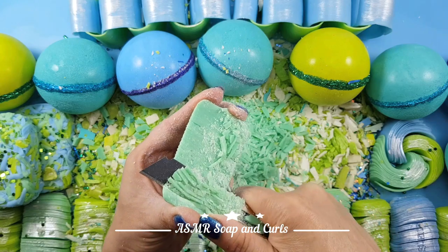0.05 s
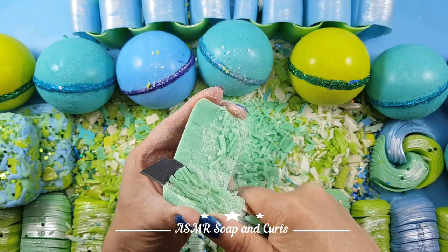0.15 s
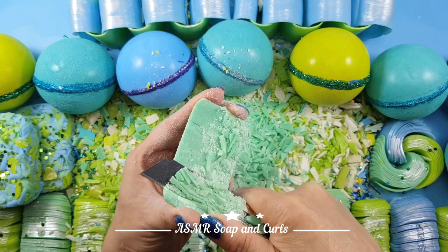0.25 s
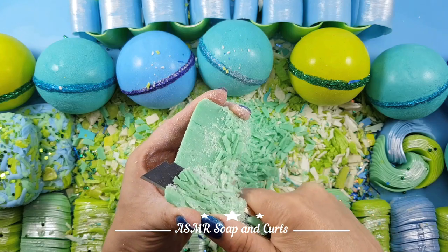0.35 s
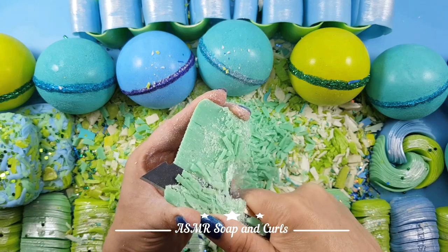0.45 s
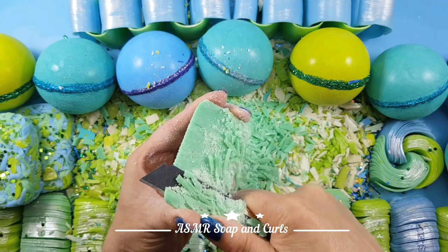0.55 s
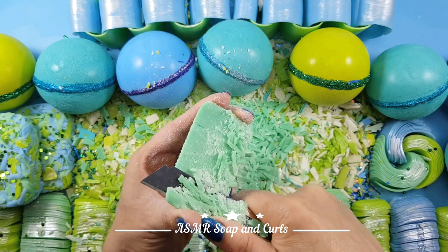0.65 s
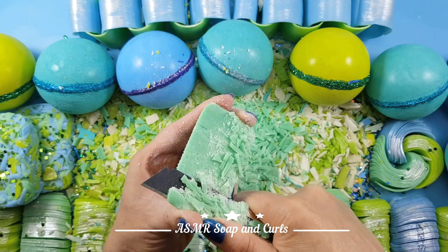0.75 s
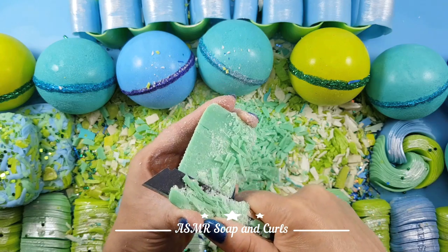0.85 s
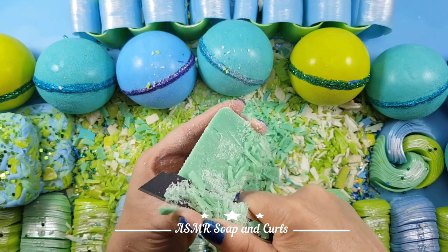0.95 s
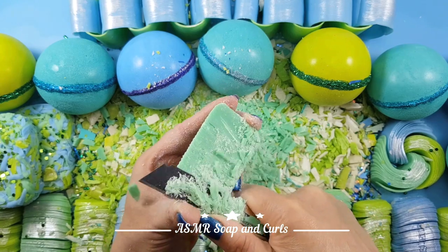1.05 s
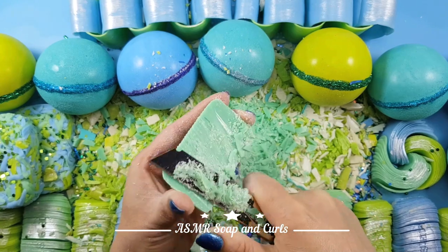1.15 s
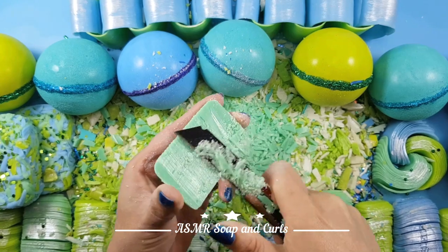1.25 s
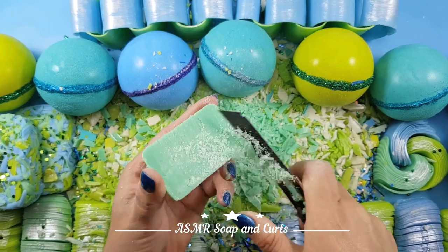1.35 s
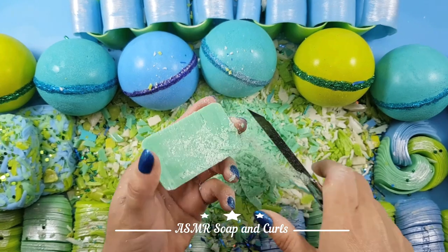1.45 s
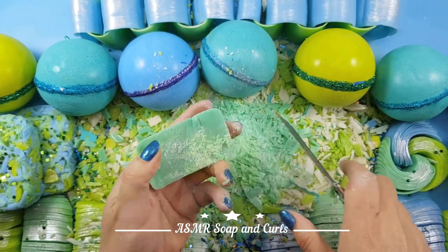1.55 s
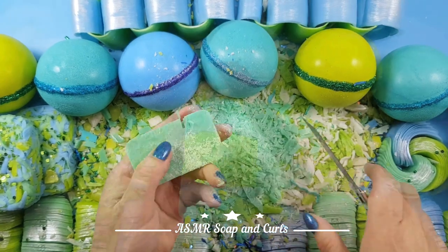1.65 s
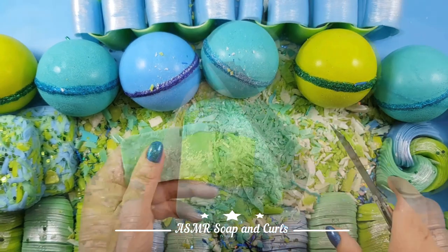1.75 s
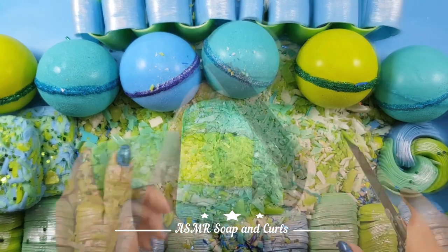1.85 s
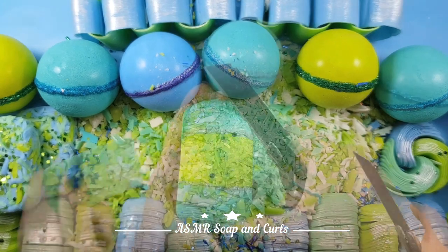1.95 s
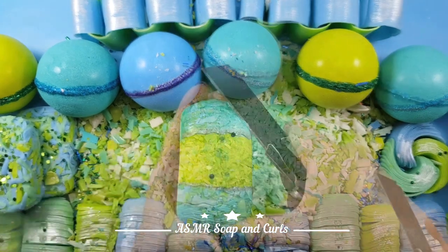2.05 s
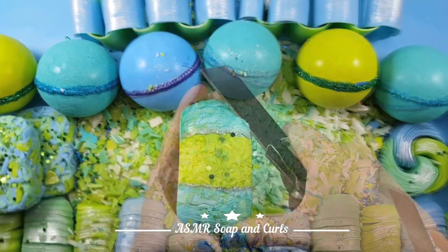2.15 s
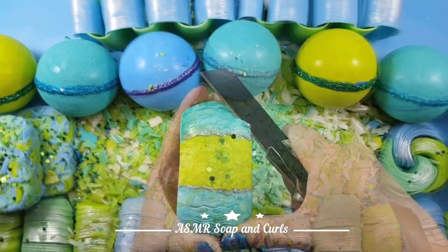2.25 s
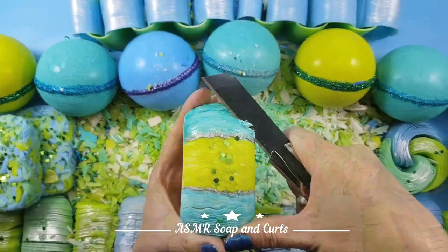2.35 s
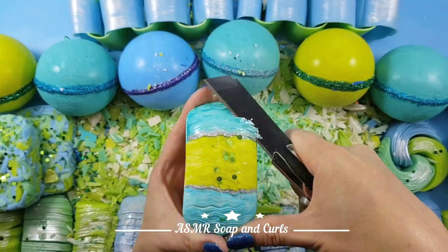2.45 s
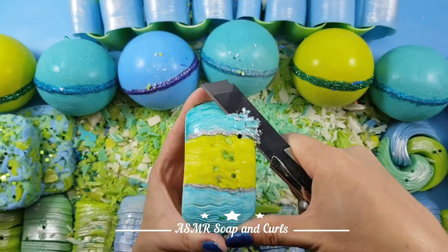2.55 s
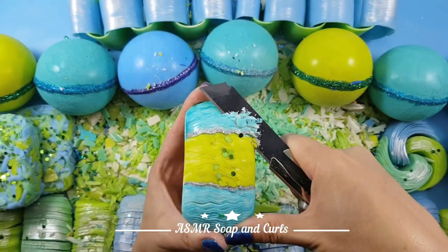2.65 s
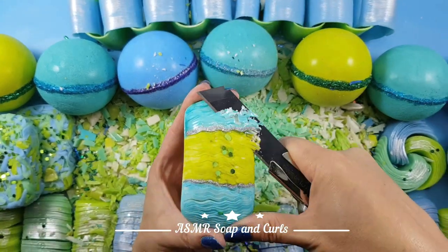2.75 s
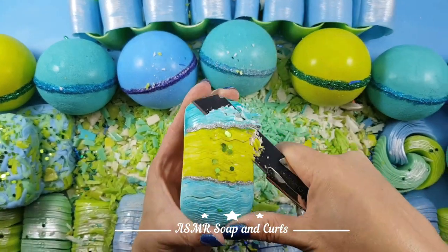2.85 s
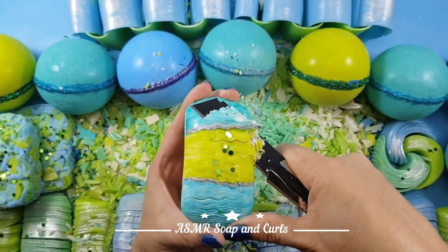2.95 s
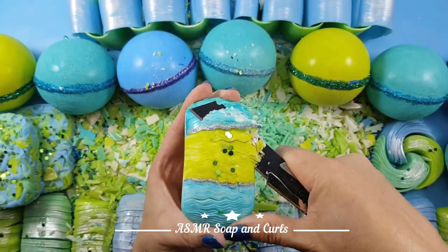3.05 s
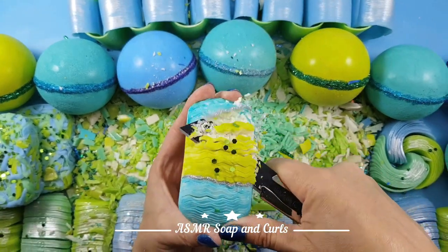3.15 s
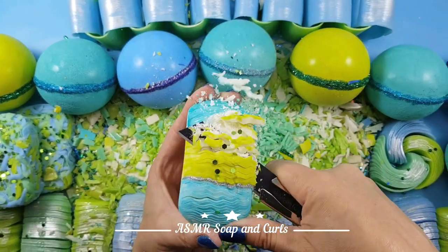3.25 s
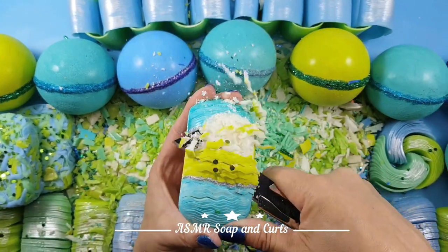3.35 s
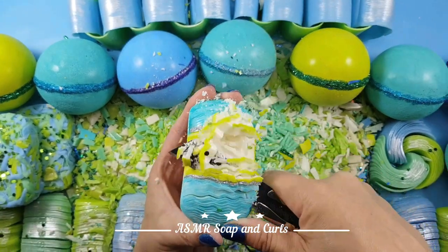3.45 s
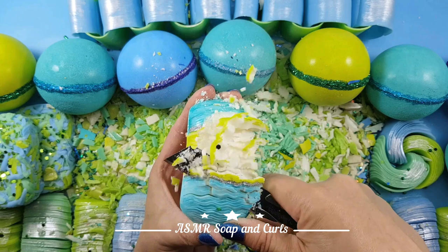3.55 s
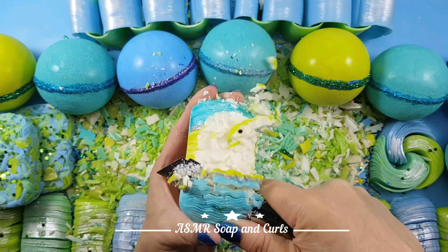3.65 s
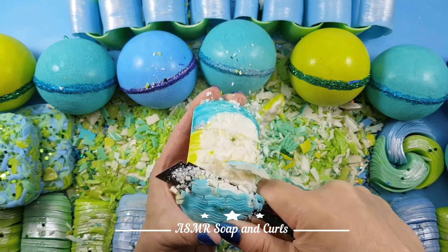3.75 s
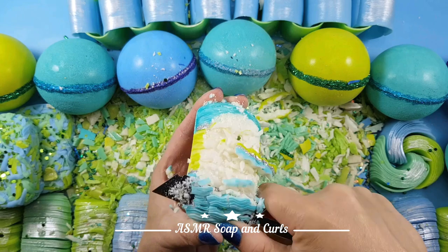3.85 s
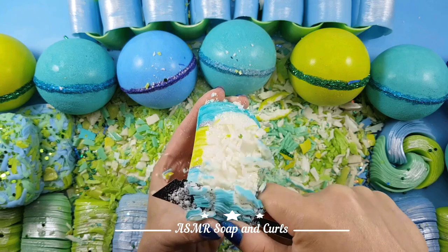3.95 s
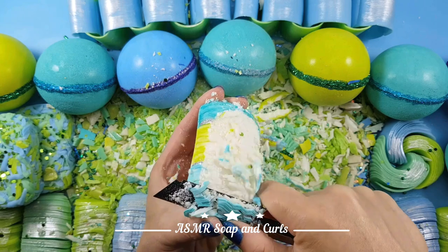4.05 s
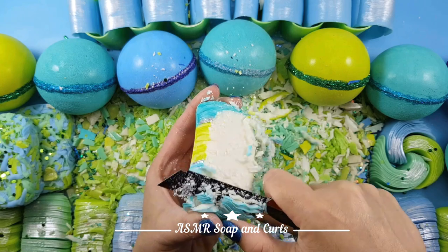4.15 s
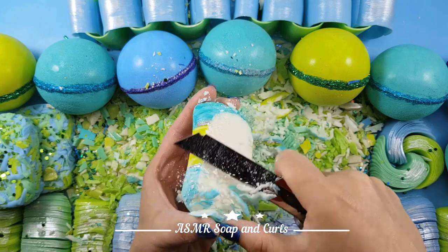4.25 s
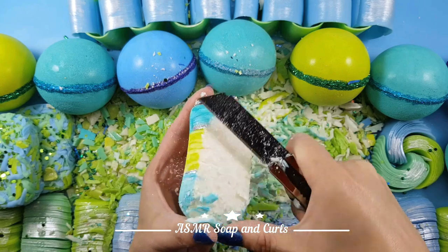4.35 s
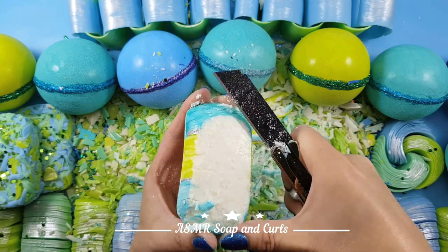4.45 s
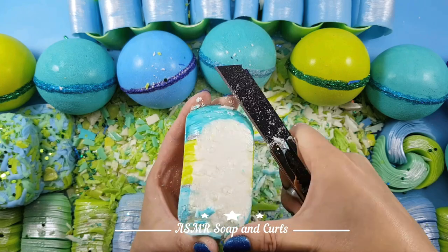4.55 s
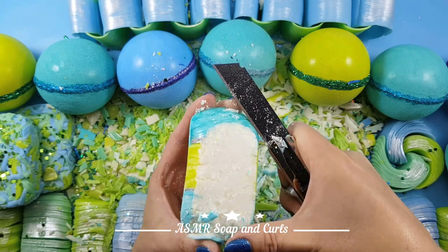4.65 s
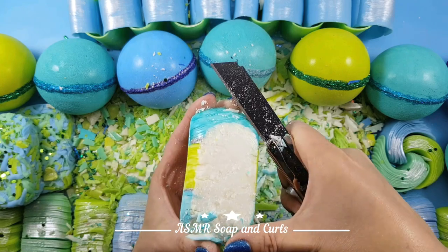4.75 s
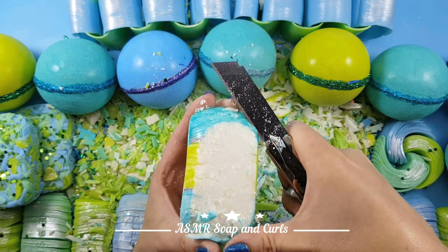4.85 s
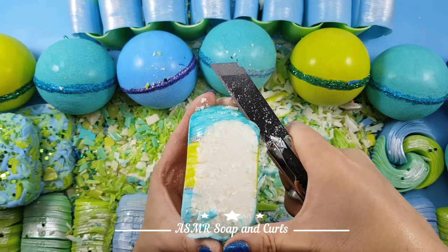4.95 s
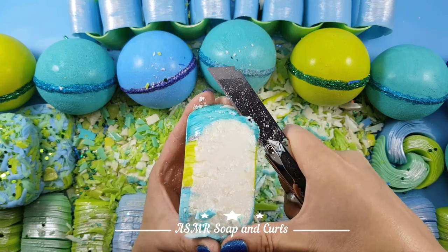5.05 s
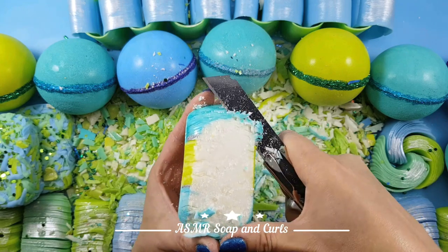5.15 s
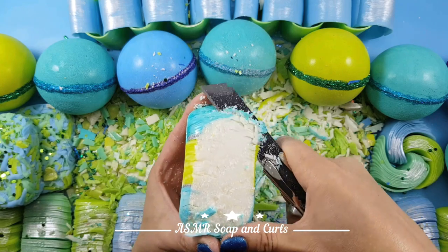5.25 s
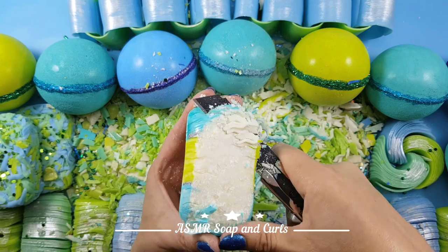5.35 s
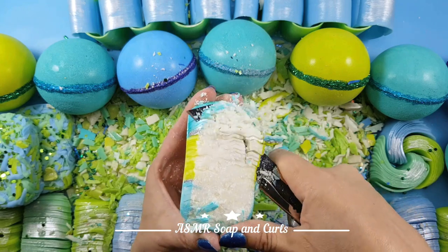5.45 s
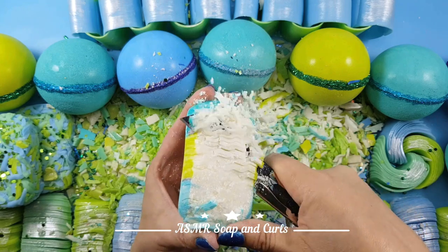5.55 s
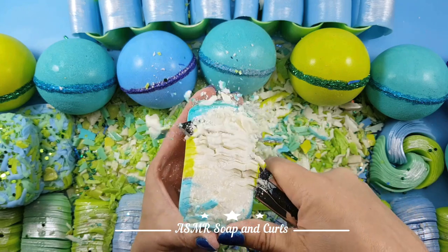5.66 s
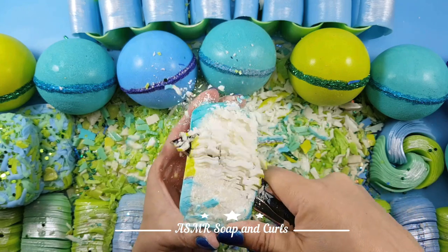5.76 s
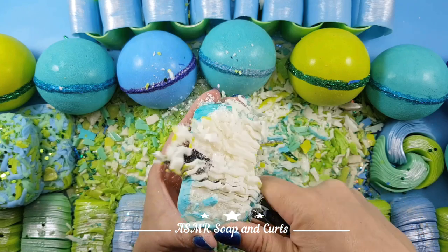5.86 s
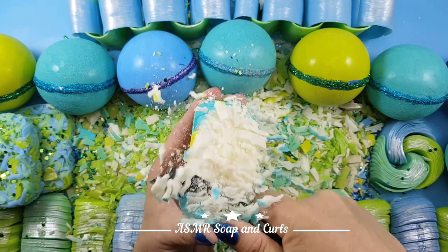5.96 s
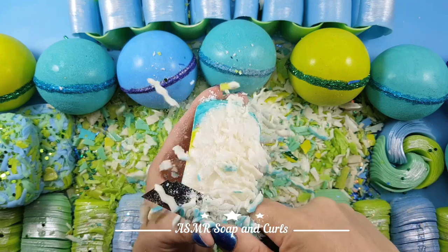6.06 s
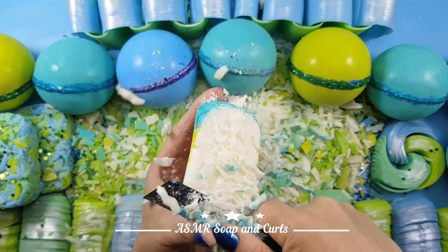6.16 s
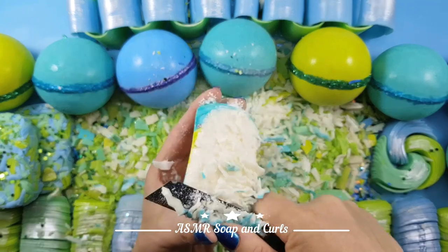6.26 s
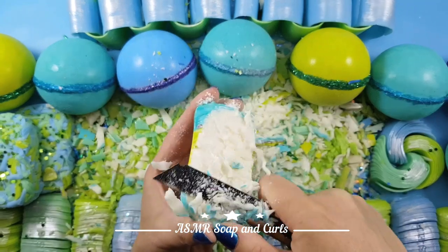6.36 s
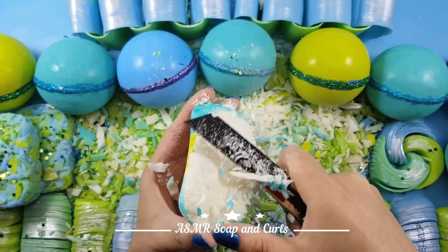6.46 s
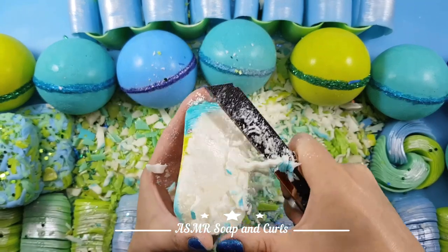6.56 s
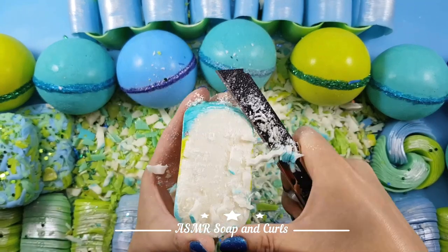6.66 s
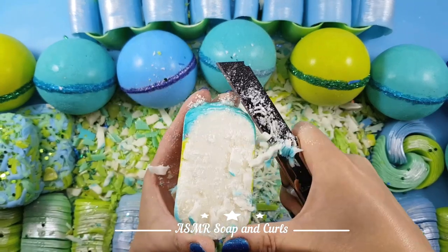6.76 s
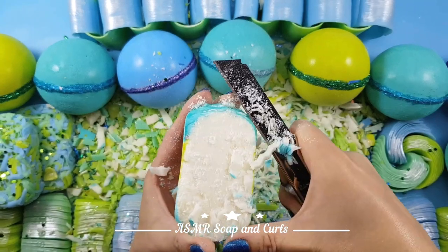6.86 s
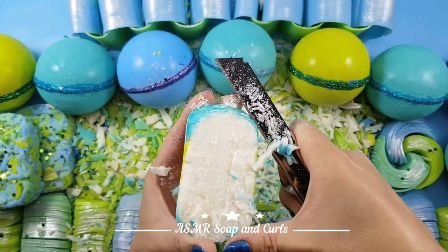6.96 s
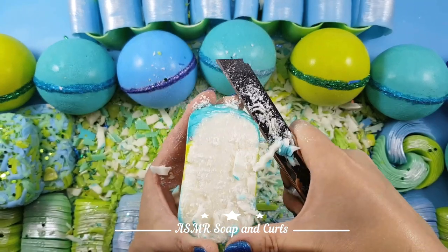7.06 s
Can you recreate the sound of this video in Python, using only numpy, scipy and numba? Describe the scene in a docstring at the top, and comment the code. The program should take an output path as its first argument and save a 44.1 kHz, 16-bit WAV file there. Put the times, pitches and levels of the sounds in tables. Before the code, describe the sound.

Very close to the microphone in a small, dry, quiet room, a knife bites through scored brittle soap. Faint rustles and tiny ticks come first, then a short crunchy burst with sharp snaps and a blade tap. A mostly quiet gap follows, then a busy run of crackling, a pause with light handling, and a longer, louder run of crunching while crumbs fall softly.

```python
"""Craft knife pushed through scored bars of dry soap, close microphone, small room, 7.1 s.
From 0 s room tone and hiss; from 0.1 s light rustles and sparse snaps; near 0.75 s the first thuds and crumbs.
From 0.9 s bites: dense crackle (rung clicks), sharp snaps (bent tones), blade rasp (rung noise), then blade taps.
Sparser from 1.5 s, busy 3.1-4.4 s, sparser again, busy 5.1-7 s; crumbs patter on a soft heap on a hollow table."""
import sys
import numpy as np
from scipy import signal
from scipy.fft import rfft, irfft, next_fast_len
from scipy.io import wavfile
from scipy.ndimage import uniform_filter1d
from numba import njit

SR = 44100
rng = np.random.default_rng(int(sys.argv[2]) if len(sys.argv) > 2 else 0)


def to_wav(sig):
    """Store sig (one row per channel, or 1-D mono) as 16-bit WAV at the path in sys.argv[1].

    Samples outside -1..1 are clipped; the rate is SR.
    """
    pcm = np.clip(np.atleast_2d(sig), -1, 1) * 32767
    pcm = np.round(pcm).astype(np.int16)
    wavfile.write(sys.argv[1], SR, pcm.T)  # frames by channels


N = 313992


def from_db(db):
    """Decibels to gain."""
    return 10 ** (np.asarray(db) / 20)


def rms_one(x):
    """Scale to unit power."""
    return x / np.sqrt(np.mean(x ** 2) + 1e-20)


def drift(rate_per_s):
    """Slow random curve with unit power: straight lines between random points."""
    steps = np.arange(N) * rate_per_s / SR
    points = rng.standard_normal(N // 20)
    return rms_one(np.interp(steps, np.arange(N // 20), points))


def colour(x, points):
    """Causal (minimum-phase) filter through points of (f/Hz, dB)."""
    size = 2 * next_fast_len(N // 2 + SR // 10)
    hz, level_db = np.transpose(points)
    freqs = np.maximum(np.arange(size // 2 + 1) * SR / size, 1)
    gain = from_db(np.interp(np.log(freqs), np.log(hz), level_db))
    gain = gain * np.minimum(freqs / hz[0], 1)   # 6 dB/octave roll-off below the first point
    cepstrum = irfft(np.log(gain))
    cepstrum[1:size // 2] *= 2
    cepstrum[size // 2 + 1:] = 0
    return irfft(rfft(x, size) * np.exp(rfft(cepstrum)))[:N]


def resonate(x, hz, width_hz):
    """One resonance with a gain of one at its top."""
    r = np.exp(-np.pi * width_hz / SR)
    zeros = np.array([1, 0, -1]) * (1 - r * r) / 2
    poles = [1, -2 * r * np.cos(2 * np.pi * hz / SR), r * r]
    return signal.lfilter(zeros, poles, x + 1e-18)


def bandpass(x, low_hz, high_hz):
    """Second-order Butterworth band."""
    return signal.sosfilt(signal.butter(2, [low_hz, high_hz], "band", fs=SR, output="sos"), x)


@njit
def glide(x, turn, r):
    """A resonance whose pitch (radians a sample) moves."""
    out, state = np.zeros(len(x)), 0j
    for i in range(len(x)):
        state = state * r * np.exp(1j * turn[i]) + x[i]
        out[i] = state.real
    return out


def grains(per_s, spread_db):
    """Clicks at random moments and signs: many small, a few large."""
    sizes = from_db(spread_db * np.minimum(rng.exponential(1, N), 4))
    return (rng.random(N) < per_s / SR) * sizes * rng.choice([-1, 1], N)


def clumping(per_s, fade_ms):
    """Each give starts at once and dies away exponentially; mean power one."""
    gives = np.abs(grains(per_s, spread_db=3.3))
    return rms_one(signal.lfilter([1], [1, -np.exp(-1000 / (fade_ms * SR))], gives))


def steady(x, window_s):
    """Near-unit power over each stretch of time, with the fine grain kept."""
    size = max(int(window_s * SR / 2), 2)
    power = uniform_filter1d(uniform_filter1d(x * x, size), size)
    return x / np.sqrt(np.abs(power) + 1e-4 * np.mean(power))


def add(out, s, level_db, sound):
    """Start a sound at s, its loudest 1.5 ms at the given RMS level."""
    at = int(s * SR)
    loudest = np.sqrt(uniform_filter1d(sound ** 2, size=66).max())
    out[at:at + len(sound)] += (from_db(level_db) * sound / loudest)[:N - at]


RISE_DB = 21.5   # climb over each rise time
HAND_SAG_DB, HAND_RELEASE_DB_PER_S = 5.5, 328   # loss over the hold; fall afterwards


def swell(s, rise_s, hold_s, sag_db, release_db_per_s):
    """Power of one gesture: builds up to s, sags over the hold, dies away; 0 dB at mid-hold."""
    t = np.arange(0, N, 32) / SR - s
    rising = RISE_DB * np.maximum(-t, 0) / max(rise_s, .001)
    sagging = sag_db * (np.clip(t / max(hold_s, .001), 0, 1) - .5)
    releasing = release_db_per_s * np.maximum(t - hold_s, 0)
    return from_db(-np.minimum(rising + sagging + releasing, 150)) ** 2


def gestures(rows, sag_db=HAND_SAG_DB, release_db_per_s=HAND_RELEASE_DB_PER_S):
    """Rows of (t/s, rise/s, hold/s, level/dB, ..) add in power: one gain curve per level column."""
    power = 0
    for s, rise_s, hold_s, *levels_db in rows:
        power = power + np.outer(from_db(levels_db) ** 2, swell(s, rise_s, hold_s, sag_db, release_db_per_s))
    return [np.interp(np.arange(N), np.arange(0, N, 32), np.sqrt(p)) for p in power]


# noise floor spectrum: f/Hz, level/dB (relative)
FLOOR_SPECTRUM = [(80, -5), (220, 2), (600, 9.5), (4000, -11.5), (7500, 5), (16000, -6)]


def noise_floor(level_db):
    """Steady coloured noise, level as RMS."""
    return from_db(level_db) * rms_one(colour(rng.standard_normal(N), FLOOR_SPECTRUM))


# fingers and knife shift on the bar: t/s, length/s, level/dB (before catching)
RUSTLES = [(0.085, 0.085, -69), (0.194, 0.16, -84.5), (0.388, 0.034, -59.5), (0.484, 0.16, -71.5),
           (0.734, 0.081, -64.5), (1.504, 0.041, -64.5), (1.675, 0.27, -66), (1.86, 0.16, -69),
           (2.22, 0.17, -68.5), (2.45, 0.042, -68), (2.56, 0.27, -63), (4.494, .11, -65.5),
           (4.759, 0.16, -73.5), (4.875, .13, -80), (5.013, 0.073, -64), (7.11, .02, -57.5)]


def rustling(rise_s=0.0115, catches_per_s=63, catch_ms=2.8, slide=0.49):
    """Gain of light shifts: skin catches and lets go, over an even slide."""
    level, = gestures([(s, rise_s, *rest) for s, *rest in RUSTLES])
    return level * steady(slide + clumping(catches_per_s, catch_ms), window_s=0.097)


# crackle spectrum: f/Hz, level/dB per Hz (relative)
CRACKLE_SPECTRUM = [(500, -12), (1100, -10.5), (1500, -13), (2100, -3), (3000, -10), (3800, -3), (5300, 2),
                    (6200, -5), (7700, -0.5), (9000, -4.5), (15500, -13)]


def crackle(clumps, per_s=5000, sharpness=9.2, dust_db=-10, own_share=1.0, own_per_s=45, own_fade_ms=25):
    """Tiny fractures ring a few cycles; flakes of one size break in own crunches, over powder hiss."""
    clicks = grains(per_s, spread_db=2.0)
    pitches_hz = np.geomspace(720, 14000, 21)
    dealt = rng.integers(0, len(pitches_hz), N)   # pitch index of each click
    crunches = [clumping(own_per_s, own_fade_ms) for _ in range(len(pitches_hz) // 3)]
    rings = 0
    for k, hz in enumerate(pitches_hz):
        force = clicks * (dealt == k) * (clumps + own_share * crunches[k // 3])
        rings = rings + rms_one(resonate(force, hz, hz / sharpness)) * np.sqrt(hz)
    powder = rng.standard_normal(N) * clumps
    mix = rms_one(rings) + from_db(dust_db) * rms_one(powder)
    return steady(colour(mix, CRACKLE_SPECTRUM), window_s=0.058)


# blade pitch as gripped by the soap, before waver: t/s, f/Hz
BLADE_PITCH = [(.95, 1400), (1.1, 2280), (1.3, 2054), (2.0, 2585), (2.3, 1854), (2.85, 1732), (4.05, 1623),
               (4.28, 2083), (4.8, 2405), (5.15, 2120), (5.3, 1840), (5.52, 1564), (6.3, 1517),
               (6.42, 2200), (6.8, 2204)]


def blade(clumps, upper_hz=2480, upper_db=-5, low_hz=1250, high_hz=3100, width_hz=190):
    """The edge slips from flake to flake; each slip rings a moving and a fixed mode of the steel."""
    slips = rng.standard_normal(N) * clumps
    s, pitch_hz = np.transpose(BLADE_PITCH)
    hz = np.interp(np.arange(N) / SR, s, pitch_hz)
    hz = hz * (1 + .03 * drift(rate_per_s=30))   # the grip keeps changing
    bend = rms_one(glide(slips, 2 * np.pi * hz / SR, np.exp(-np.pi * width_hz / SR)))
    upper = from_db(upper_db) * rms_one(resonate(slips, upper_hz, width_hz))
    return steady(bandpass(bend + upper, low_hz, high_hz), window_s=.03)


# large flakes snapping, before mix gain: t/s, level/dB, crack run/ms (fades from 0.6 of it), f/Hz
SNAPS = [(.106, -50.5, .15, 8000), (.3902, -43.5, 1.2, 6700), (.7702, -43, 0.76, 7300),
         (.9305, -36, 5.3, 2750), (.94, -22.5, 7.8, 1407), (1.0193, -13.5, 2.4, 2560),
         (1.0229, -15, 2.4, 2950), (1.032, -10.5, 1.2, 2770), (1.0365, -25, 5.5, 2630),
         (1.0985, -44, .5, 6450), (1.2413, -25.5, 16, 4900), (1.2563, -29.5, 4.9, 2970),
         (1.2884, -20, 10, 2440), (1.3128, -26, 14.6, 2335), (1.3299, -28, 9.5, 2880),
         (1.388, -35, 0.78, 4570), (1.6941, -44, .5, 5990), (1.867, -44, 1.1, 6000),
         (2.311, -46, 0.45, 5500), (2.5713, -34.5, 11.8, 2340), (2.619, -31.5, 2.3, 2560),
         (2.8652, -27, 2, 2200), (2.975, -46.5, 0.61, 6830), (3.1648, -21.5, 8.1, 2590),
         (3.1954, -26.5, 0.6, 6170), (3.2024, -22, 2.3, 2730), (3.284, -30.5, 3.2, 5280),
         (3.3268, -25.5, 3.5, 4800), (3.3878, -14.5, 0.28, 2260), (3.3945, -13.5, 3.2, 1330),
         (3.4076, -16, 0.57, 4100), (3.4557, -22.5, 0.54, 3770), (3.627, -24, .25, 7300),
         (3.689, -9.5, 0.26, 3800), (3.7271, -11.5, 2.4, 5200), (3.7356, -17, 0.63, 4900),
         (3.7533, -27, 3.4, 3940), (4.124, -47.5, 21, 810), (4.284, -26, 5.1, 2480),
         (4.7737, -35, .9, 5360), (5.1234, -1, 5.7, 2398), (4.835, -46.5, 1.24, 2600),
         (5.2726, -30.5, 1.7, 2800), (5.5036, -24, 8.5, 1870), (5.6844, -22, 0.36, 4150),
         (5.7007, -23, 1.7, 2370), (5.7624, -21.5, 0.44, 1940), (5.7983, -20, 10.4, 1683),
         (5.8726, -15.5, 0.32, 3840), (5.9603, -20.5, 8.3, 3100), (6.031, -15, 0.6, 4820),
         (6.0672, -23.5, 0.56, 4600), (6.0879, -23.5, 0.42, 1890), (6.1604, -19, .4, 5890),
         (6.1777, -21, .35, 1310), (6.1944, -20.5, 0.71, 1190), (6.213, -2, 5.7, 3650),
         (6.406, -17, 5.3, 4240), (6.4125, -16, 3.2, 2180), (6.4245, -21, 0.72, 4140),
         (6.583, -29, 6.4, 4740)]
# bar and knife modes shaken by every snap: f/Hz, width/Hz, level/dB (before focus and chance)
BAR_MODES = [(546, 23, -5.5), (891, 85, 1), (1570, 170, 2), (2030, 410, 0.5), (2538, 340, -2.5),
             (3250, 62, -3), (3430, 470, -1), (4370, 280, -3), (5160, 410, -1.5), (7180, 1200, -6.5),
             (9500, 4000, -19.5)]


def snaps(rows, fade_ms=1.0, bar_db=2, focus_db=7.0, debris_db=-24, debris_ms=14, vary_db=6.0):
    """A running crack rings the flake unsteadily and shakes the bar; debris scatters behind it."""
    out, ms = np.zeros(N), np.arange(SR // 12) * 1000 / SR
    for s, level_db, run_ms, hz in rows:
        crack = np.exp(-np.maximum(ms - run_ms * .6, 0) / fade_ms) * (1 - np.exp(-ms / .12))
        waver = rms_one(uniform_filter1d(rng.standard_normal(len(ms)), size=14))
        flake = crack * np.sin(2 * np.pi * np.cumsum(hz * (1 + .17 * waver)) / SR)
        debris = from_db(debris_db) * np.exp(-ms / debris_ms)
        force = rng.standard_normal(len(ms)) * (crack + debris)
        bar = 0
        for k, (mode_hz, width_hz, mode_db) in enumerate(BAR_MODES):
            # modes near the flake pitch answer most, lower ones least
            distance = max(np.log2(hz / mode_hz), 0.07 * np.log2(mode_hz / hz))
            strength = from_db(mode_db - focus_db * distance + vary_db * rng.normal())
            bar = bar + (-1) ** k * strength * resonate(force, mode_hz, width_hz)
        add(out, s, level_db, rms_one(flake) + from_db(bar_db) * rms_one(bar))
    # small flakes radiate little bass
    return signal.sosfilt(signal.butter(2, 300, "high", fs=SR, output="sos"), out)


def chips(crunch, count=130, above_db=10, spread_db=-0.5, run_ms=1.2, middle_hz=3360, spread_octaves=1):
    """Rows for snaps(): small chips fly at random, level following the crackle gain."""
    at = rng.integers(0, N - SR // 100, count)
    level, run, pitch = np.clip(rng.standard_normal((count, 3)), -2, 2).T
    level_db = 20 * np.log10(crunch[at]) + above_db + spread_db * level
    hz = middle_hz * 2 ** (spread_octaves * pitch)
    return np.transpose([at / SR, level_db, run_ms * np.exp(run), hz])


# crumbs shower onto the heap: t/s, length/s, patter/dB, boom/dB (boom before boom_gain_db)
SHOWERS = [(0.754, 0.027, -60.5, -71), (1.145, 0.15, -52.5, -62), (2.637, 0.011, -48.5, -75.5),
           (3.152, 0.047, -50.5, -61), (3.399, 0.1, -49, -54), (3.535, 0.04, -43, -52.5),
           (3.701, 0.084, -43.5, -54), (3.822, 0.078, -47, -41), (4.01, 0.034, -53, -61),
           (4.147, 0.037, -41, -48), (4.268, 0.05, -36, -45), (4.39, 0.064, -59.5, -64),
           (4.494, 0.074, -53.5, -58.5), (5.532, 0.069, -50, -51), (5.696, 0.15, -43.5, -52),
           (5.884, 0.43, -42, -52.5), (6.182, 0.11, -39, -45.5), (6.36, 0.086, -52, -59),
           (6.479, 0.3, -48.5, -59), (6.994, .02, -66, -73.5)]


def showering(rise_s=0.061, sag_db=1, release_db_per_s=230.5):
    """Patter and boom gains of the falling crumbs."""
    return gestures([(s, rise_s, *rest) for s, *rest in SHOWERS], sag_db, release_db_per_s)


# table modes under the heap: f/Hz, width/Hz, level/dB (relative)
TABLE_MODES = [(177.4, 16, 5.5), (231, 30, 1), (291.3, 45, 2), (374, 200, -7.5), (860, 760, -16)]


def crumbs(patter_gain, boom_gain, boom_gain_db=1.0, soft_hz=1400, boom_hz=81.4, boom_width_hz=7.4):
    """Soft landings come in lumps and knock the low modes of the table."""
    knocks = rng.standard_normal(N) * (.5 + clumping(per_s=70, fade_ms=5.5))
    modes = 0
    for k, (hz, width_hz, db) in enumerate(TABLE_MODES):
        modes = modes + (-1) ** k * from_db(db) * resonate(knocks, hz, width_hz)
    patter = steady(bandpass(modes, 145, soft_hz), window_s=0.15)
    boom = steady(resonate(resonate(knocks, boom_hz, boom_width_hz), boom_hz, 45), window_s=0.13)
    return patter_gain * patter + boom_gain * from_db(boom_gain_db) * boom


def strikes(rows, rise_ms, fade_ms, overtone, overtone_db, knock_db):
    """A struck thing rings at one pitch, with a shorter overtone and a rough knock."""
    out, ms = np.zeros(N), np.arange(SR // 8) * 1000 / SR
    for s, level_db, hz in rows:
        turn = 2 * np.pi * hz * ms / 1000
        fade = np.exp(-ms / fade_ms)
        knock = rms_one(resonate(resonate(rng.standard_normal(len(ms)), hz, hz), hz, hz))
        ring = np.sin(turn) + from_db(overtone_db) * fade * np.sin(overtone * turn) + from_db(knock_db) * knock
        add(out, s, level_db, ring * fade * (1 - np.exp(-ms / rise_ms)))
    return out


# lumps drop, the hand bumps the heap: t/s, level/dB, f/Hz
THUDS = [(.757, -44, 176), (.785, -43.5, 183.7), (2.617, -32.5, 333), (2.735, -54, 346), (3.79, -30.5, 302),
         (3.852, -30, 253), (4.126, -26, 305), (4.148, -29, 303.5), (5.124, -31, 592), (5.688, -36.5, 332),
         (6.29, -30.5, 304), (6.497, -41, 316), (6.622, -44.5, 357)]


def thuds():
    """Soft, low, slow-rising strikes on the heap."""
    return strikes(THUDS, rise_ms=3.6, fade_ms=11.0, overtone=1.7, overtone_db=-8.5, knock_db=-10.5)


# edge bites, a row of flakes gives way: t/s at end of rise, rise/s, hold/s, rasp/dB, crackle/dB
BITES = [(.94, .015, 0.0038, -55, -48.5), (1.025, 0.0048, 0.014, -39, -43.5),
         (1.25, 0.0079, 0.081, -39, -42), (1.415, 0.034, 0.0089, -42, -46),
         (2.622, .02, 0.0083, -41, -42.5), (2.84, 0.036, 0.042, -38, -46.5), (2.91, 0.026, 0.072, -63, -63),
         (3.14, .05, 0.069, -36.5, -41), (3.342, 0.0072, .05, -47, -43.5),
         (3.395, 0.021, 0.056, -42, -43.5), (3.52, .06, 0.028, -48, -42), (3.61, 0.035, 0.072, -60, -48),
         (3.68, 0.06, 0.093, -45, -43), (3.86, 0.048, 0.06, -52.5, -41), (4.005, 0.026, 0.025, -54.5, -54),
         (4.275, 0.025, 0.0089, -32, -36), (4.36, .03, 0.032, -53, -51),
         (5.13, 0.0068, 0.048, -31.5, -41.5), (5.27, 0.01, 0.089, -41, -58),
         (5.372, 0.01, 0.011, -31.5, -41), (5.507, 0.011, 0.0098, -26.5, -37),
         (5.56, 0.018, 0.01, -37, -37.5), (5.7, .02, 0.059, -41.5, -42), (5.8, 0.023, 0.23, -36.5, -39.5),
         (5.955, 0.049, 0.11, -34, -36), (6.18, 0.041, 0.022, -44, -39), (6.225, .012, 0.11, -40, -41.5),
         (6.41, 0.055, 0.005, -35.5, -43.5), (6.777, 0.0066, 0.027, -52.5, -69),
         (6.938, .01, 0.029, -43.5, -49)]
# knife travels down the bar, low crunch: t/s, length/s, rasp/dB, crackle/dB
STROKES = [(1.112, 0.19, -57, -57.5), (2.219, 0.069, -63, -74), (2.47, 0.45, -70, -85.5),
           (3.2, 1.24, -70.5, -56), (5.184, 1.19, -49.5, -53.5), (6.455, .36, -73, -56)]   # rasp of both tables is before blade_gain_db


def cutting(stroke_rise_s=.04):
    """Rasp and crackle gains of strokes and bites."""
    strokes = [(s, stroke_rise_s, *rest) for s, *rest in STROKES]
    return gestures(strokes + list(BITES))


# blade taps the bar and rings freely: t/s, level/dB, f/Hz
TAPS = [(1.1215, -30, 2560), (1.432, -32.5, 2220), (1.668, -57.5, 2440), (1.7385, -43.5, 2600),
        (1.878, -52, 2550), (1.9475, -48, 2480), (1.996, -47, 2460), (4.387, -36, 2490),
        (4.4033, -40, 2440), (5.0278, -26, 2330), (6.774, -42, 2380), (6.936, -37.5, 2310),
        (6.9676, -24, 2560)]


def taps():
    """Short, quick-rising rings of the blade."""
    return strikes(TAPS, rise_ms=.4, fade_ms=3.6, overtone=1.8, overtone_db=-12, knock_db=-11)


def effort(rustle_rasp_db=-5, rustle_patter_db=-6, hand_patter_db=-13.5, hand_boom_db=-30):
    """Gains of rasp, crackle, patter and boom; cuts and rustles also shake hand and heap."""
    rustle = rustling()
    rasp, cut = cutting()
    patter, boom = showering()
    handled = np.hypot(from_db(hand_patter_db) * cut, from_db(rustle_patter_db) * rustle)
    rasp = np.hypot(rasp, from_db(rustle_rasp_db) * rustle)
    crunch = np.hypot(cut, rustle)
    return rasp, crunch, np.hypot(patter, handled), np.hypot(boom, from_db(hand_boom_db) * crunch)


def room(x, wet_db=-19, t60_s=0.11, dull_hz=6000):
    """Short, faint, dull noise tail after 4 ms; wet_db is tail energy before dulling."""
    t = np.arange(SR // 2) / SR
    tail = rng.standard_normal(len(t)) * from_db(-60 * t / t60_s) * (t > .004)
    tail = tail / np.sqrt(np.sum(tail ** 2))
    tail = signal.sosfilt(signal.butter(2, dull_hz, fs=SR, output="sos"), tail)
    return from_db(wet_db) * signal.fftconvolve(x, tail)[:N]


def scene(even_share=0.24, blade_gain_db=-1, snap_gain_db=-2.0, width_db=-33, tone_db=-76, hiss_db=-87.5):
    """Fractures come in clumps that drive blade and flakes together; all is near the centre."""
    rasp, crunch, patter, boom = effort()
    clumps = even_share + clumping(per_s=170, fade_ms=3.8)
    soap = crunch * crackle(clumps) + from_db(blade_gain_db) * rasp * blade(clumps)
    flakes = from_db(snap_gain_db) * snaps(SNAPS) + snaps(chips(crunch))
    dry = soap + flakes + crumbs(patter, boom) + thuds() + taps()
    mid = dry + room(dry) + noise_floor(tone_db)
    side = room(dry, wet_db=width_db, t60_s=.08, dull_hz=14000) + noise_floor(hiss_db)
    return np.array([mid + side, mid - side])


def record(dry, bass_hz=55, treble_hz=11500, cutoff_hz=16000, top=.75):
    """Loudest peaks are rounded off; the microphone softens bass and treble, and the top is cut."""
    rounded = top * np.tanh(dry / top)
    heard = signal.sosfilt(signal.butter(1, [bass_hz, treble_hz], "band", fs=SR, output="sos"), rounded)
    return signal.sosfilt(signal.ellip(10, .1, 80, cutoff_hz, fs=SR, output="sos"), heard)


dry = scene()
out = record(dry)
to_wav(out)
```